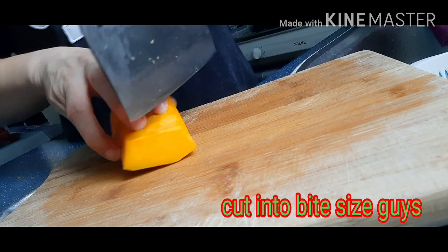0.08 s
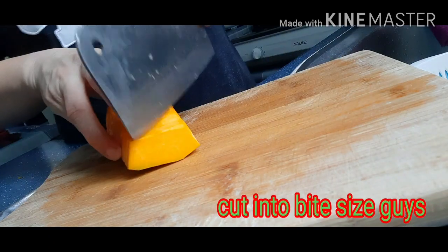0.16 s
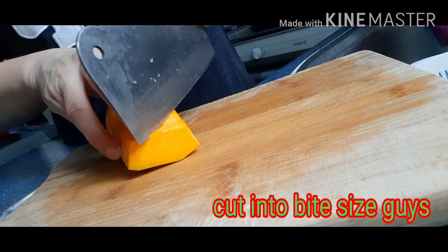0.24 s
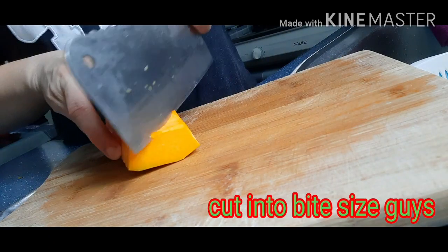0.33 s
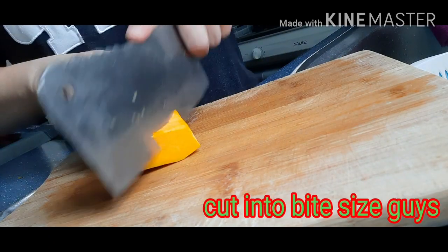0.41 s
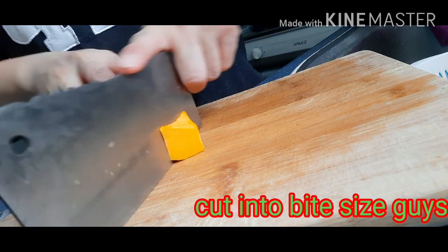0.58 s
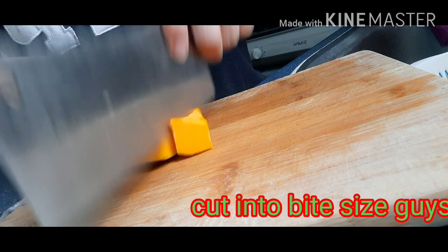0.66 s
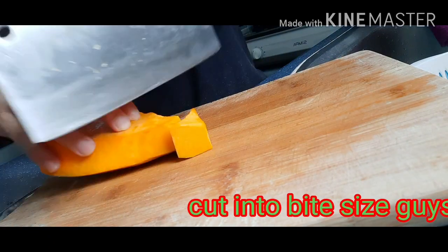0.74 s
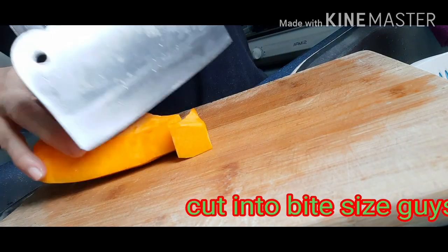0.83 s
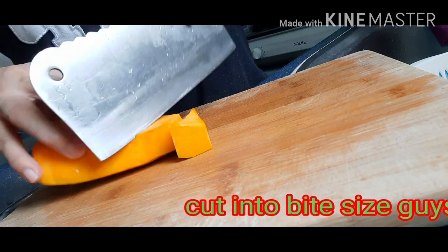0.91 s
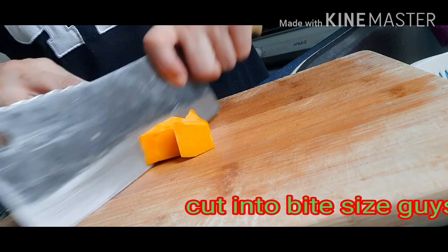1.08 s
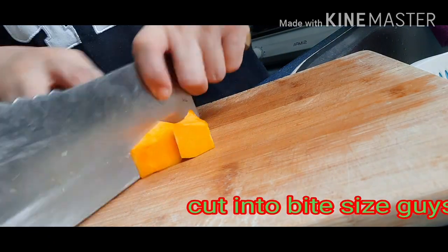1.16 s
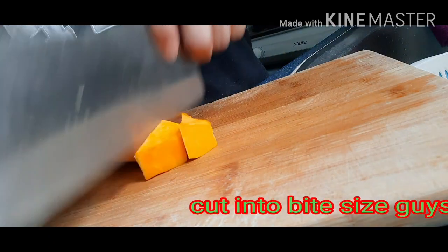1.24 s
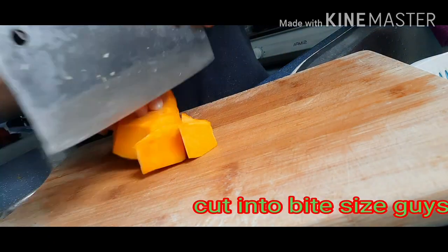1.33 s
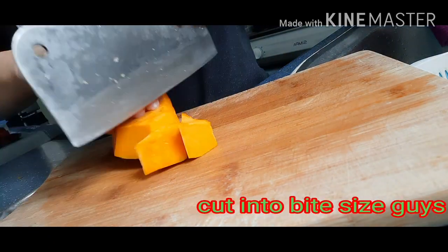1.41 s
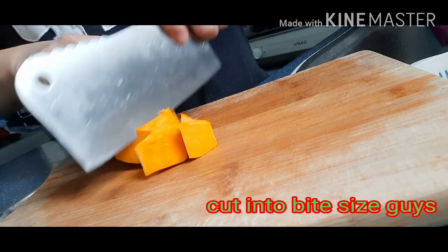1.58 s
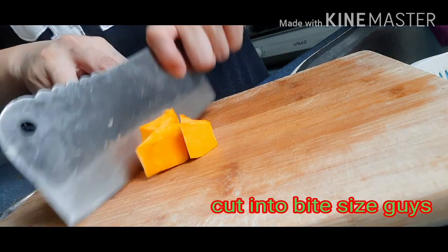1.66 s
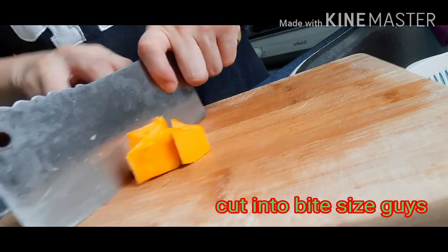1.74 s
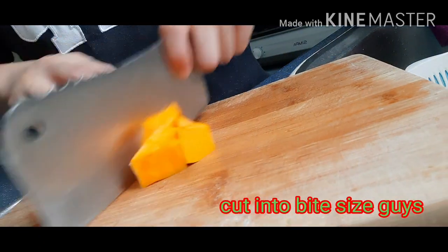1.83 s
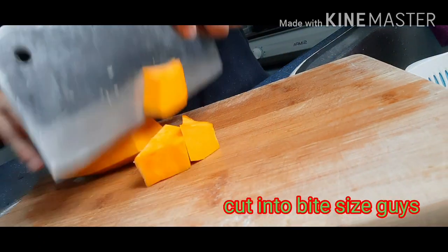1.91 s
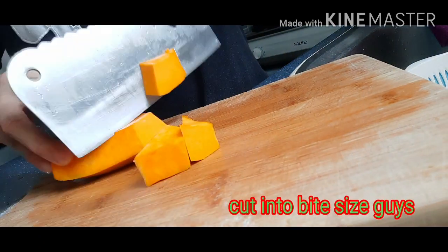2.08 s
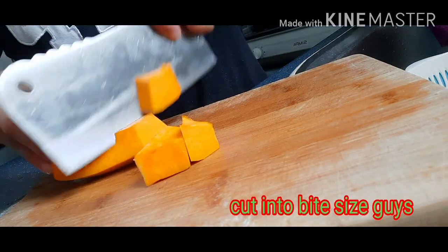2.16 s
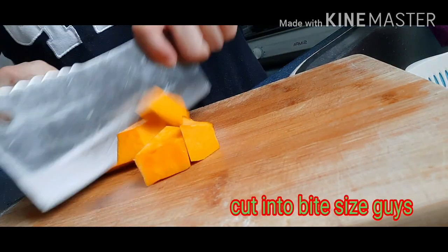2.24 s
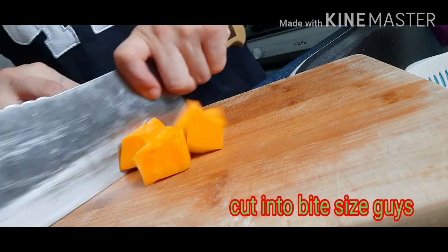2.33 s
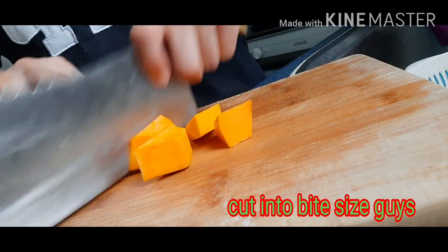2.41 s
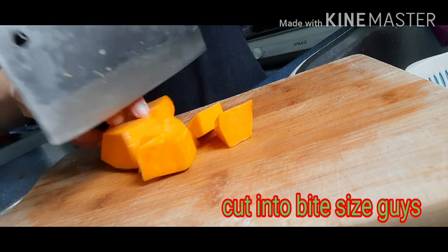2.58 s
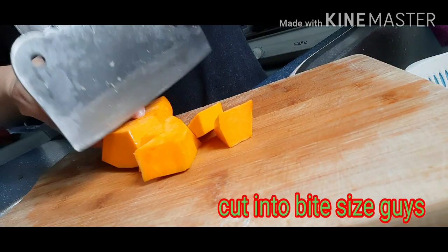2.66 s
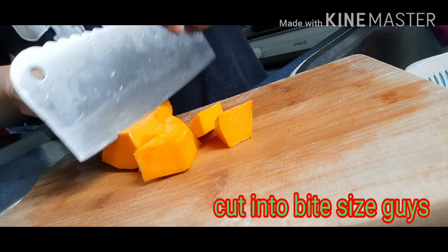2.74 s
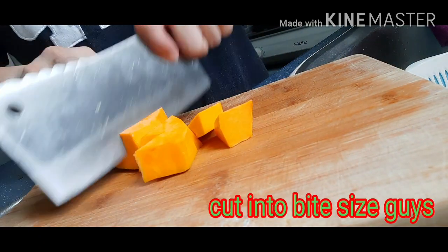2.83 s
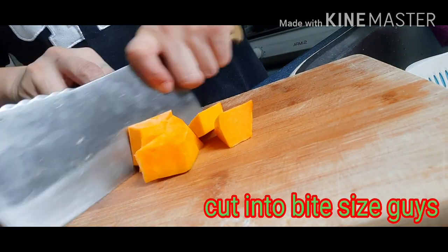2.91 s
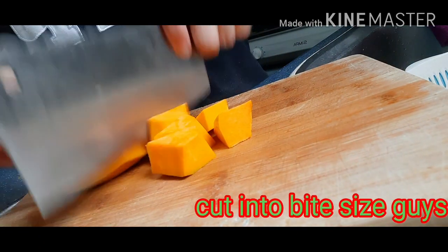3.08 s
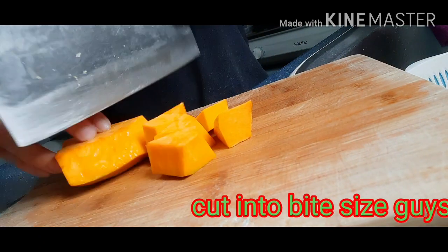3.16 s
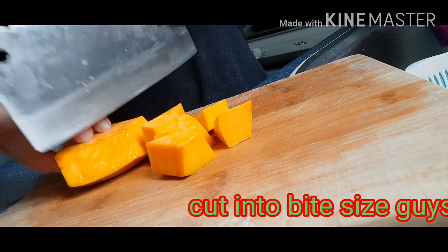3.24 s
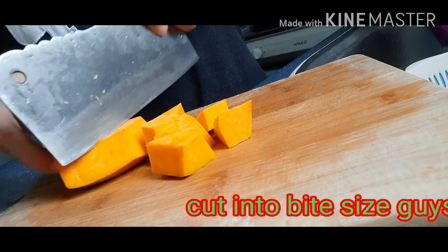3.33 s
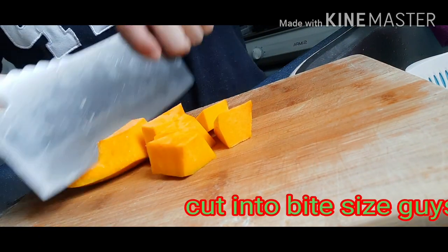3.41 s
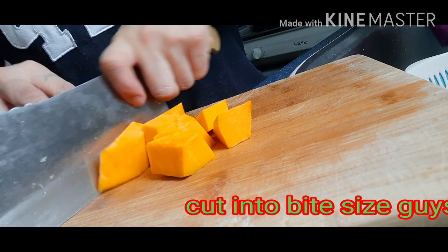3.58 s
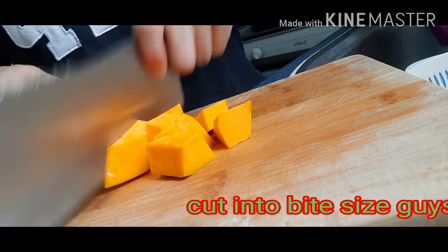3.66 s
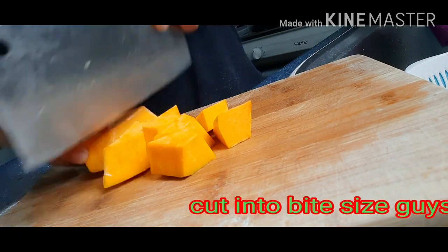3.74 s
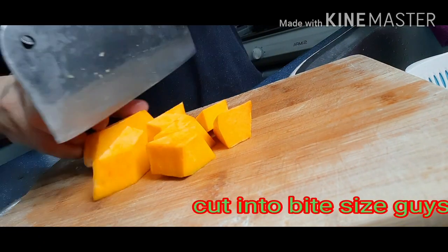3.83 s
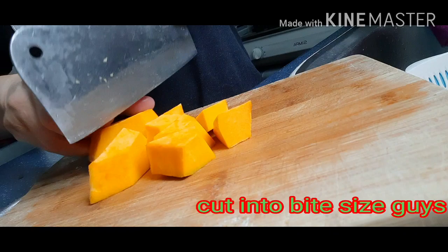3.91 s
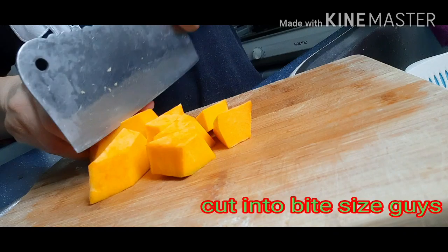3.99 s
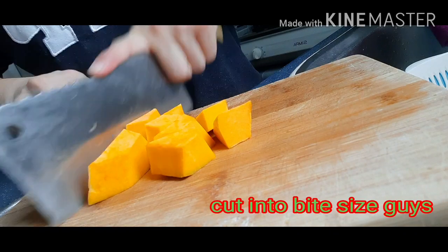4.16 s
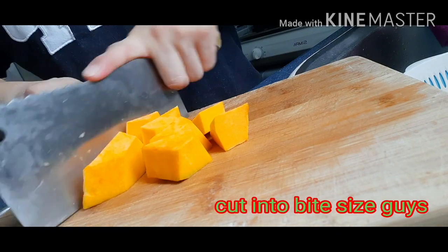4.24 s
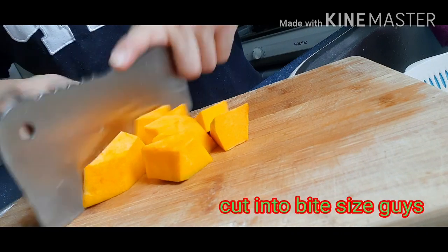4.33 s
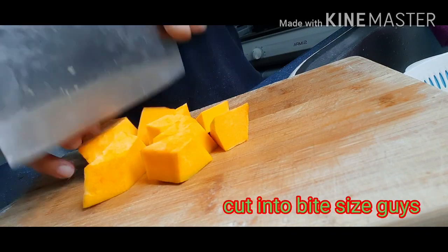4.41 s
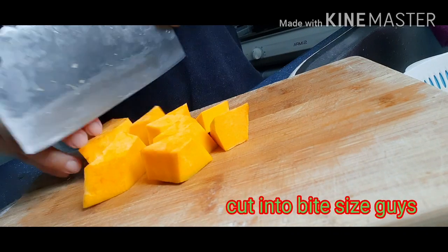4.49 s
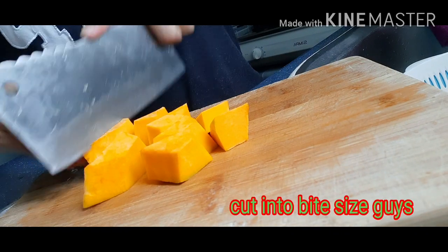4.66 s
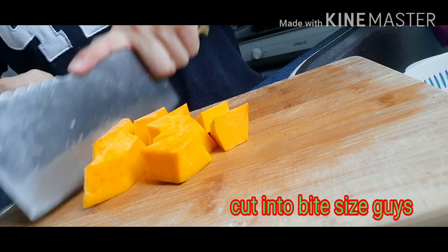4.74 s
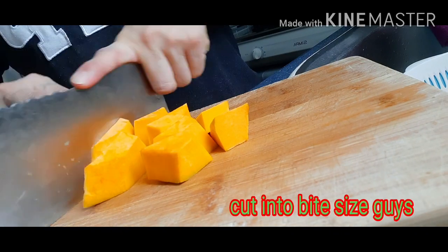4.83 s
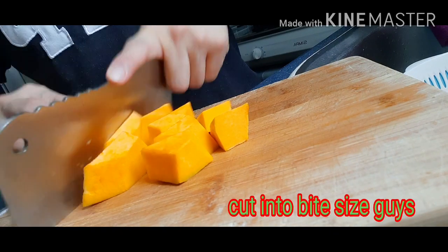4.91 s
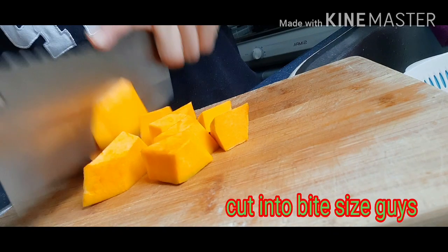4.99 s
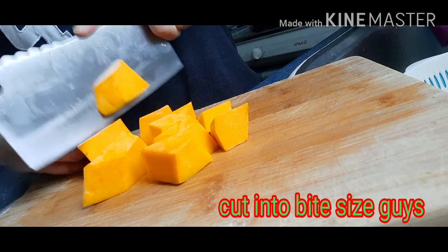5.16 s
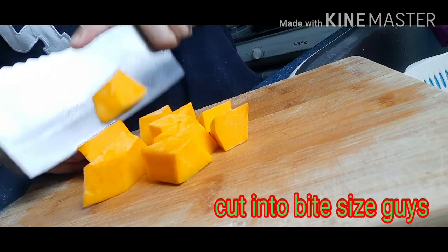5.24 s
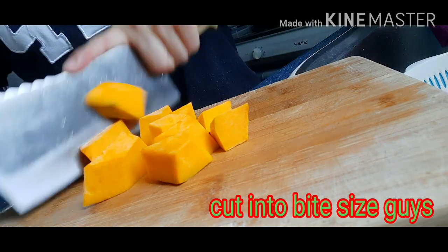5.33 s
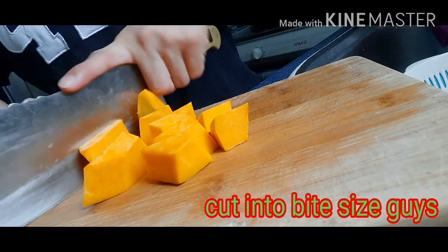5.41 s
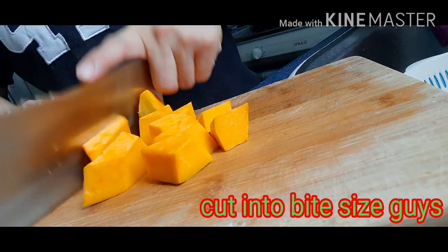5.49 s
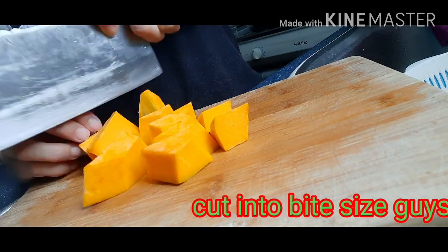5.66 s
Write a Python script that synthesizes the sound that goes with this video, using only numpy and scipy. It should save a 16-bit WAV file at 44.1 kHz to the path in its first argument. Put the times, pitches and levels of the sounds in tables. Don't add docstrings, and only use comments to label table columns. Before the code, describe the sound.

A steel cleaver hisses through raw pumpkin and lands in hard, ringing knocks on a thick wooden board in a small kitchen.

```python
import sys
import numpy as np
from scipy import signal
from scipy.fft import rfft, irfft, next_fast_len
from scipy.io import wavfile

SR = 44100
rng = np.random.default_rng(int(sys.argv[2]) if len(sys.argv) > 2 else 0)


def decibels_to_gain(level_db):
    exponent = np.asarray(level_db, float) / 20
    return 10 ** exponent


def persist_wave(psi):
    counts = np.round(np.clip(psi, -1, 1) * 32767).astype(np.int16)
    wavfile.write(sys.argv[1], SR, np.atleast_2d(counts).T)


N = 250488

# [f/Hz, level/dB, t60/s]
EDGE = [(1610, -11, .06), (1800, -15, .02), (2030, -16.5, 0.029), (2072, -8, .08), (2160, -1.5, 0.053),
        (2140, -10, 0.027), (2375, -13, 0.017), (2720, -11, 0.039), (2930, -8, 0.014), (3070, -10, .02),
        (3656, -14.5, 0.037), (3900, -10, .015), (4250, -11, 0.011), (4960, -14, 0.0042)]
# [t/s, level/dB]
BUSY = [
    (0, -1),
    (.8, -0.5),
    (1.5, -1),
    (2.5, 0),
    (3.25, -5),
    (3.8, -1.5),
    (4.5, -1),
    (5.1, 1),
    (5.68, 0.5),
]


def rms_one(x):
    return x / np.sqrt(np.mean(x ** 2) + 1e-20)


def at_hz(points, hz):
    points = np.array(points)
    return np.interp(np.log(hz), np.log(points[:, 0]), points[:, 1])


def filtered(x, order, hz, kind):
    return signal.sosfilt(signal.butter(order, hz, kind, fs=SR, output="sos"), x)


def busy_db():
    return np.interp(np.arange(N) / SR, *np.transpose(BUSY))


def drift(rate):
    r = np.exp(-80 * np.pi * rate / SR)
    noise = rng.standard_normal(N // 40 + 2002)
    slow = signal.lfilter([1], [1, -2 * r, r * r], noise)[2000:]
    return np.interp(np.arange(N) / 40, np.arange(len(slow)), rms_one(slow))


def clicks(s, db):
    out = np.full(N, 1e-18)
    np.add.at(out, np.round(np.asarray(s) * SR).astype(int), decibels_to_gain(db))
    return out


def soften(x, hz):
    r = np.exp(-2 * np.pi * hz / SR)
    return signal.lfilter([(1 - r) ** 2], [1, -2 * r, r * r], x)


def ring(force, hz, t60):
    r = decibels_to_gain(-60 / (t60 * SR))
    w = 2 * np.pi * hz / SR
    return signal.lfilter([0, np.sin(w)], [1, -2 * r * np.cos(w), r * r], force)


def banded(source, spectrum, patchy_db, patch_rate):
    # [f/Hz, likeness]
    likeness = [(60, 0.9), (300, 0.98), (1000, 0.73), (3000, 0.047), (10000, 0.026)]
    out, together = 0, drift(2.7)
    low, high = spectrum[0][0], spectrum[-1][0]
    edges = np.geomspace(low, high, int(3 * np.log2(high / low)) + 2)
    for k, (lo, hi) in enumerate(zip(edges, edges[1:])):
        mid, side = filtered(source[k % 2], 2, [lo, hi], "band")
        hz = np.sqrt(lo * hi)
        alike = np.clip(at_hz(likeness, hz), 0, 1)
        flicker_db = patchy_db * (0.19 * together + drift(patch_rate))
        gain = decibels_to_gain(at_hz(spectrum, hz) + flicker_db)
        out = out + gain * (np.sqrt(1 + alike) * mid + np.sqrt(1 - alike) * side * [[1], [-1]])
    return rms_one(out)


def room_air():
    # [f/Hz, level/dB]
    air_colour = [(760, -31), (1300, -43), (1600, 14), (1870, -12), (2230, -1), (2740, 22.5), (2980, 1),
                  (3630, 5.5), (5330, -52.5), (5910, -6), (7500, -23), (11200, -11.5), (15500, -58.5)]
    air = banded(rng.standard_normal((2, 2, N)), air_colour, patchy_db=0.8, patch_rate=5.0)
    return decibels_to_gain(-72.5 + 2.5 * busy_db()) * air


def cupboards_and_pans():
    # [f/Hz, width/Hz, level/dB]
    hums = [(439, 45, -67), (764, 89, -69.5), (1052, 88, -73), (1527, 60, -78), (2210, 250, -74),
            (2810, 180, -91.5), (3440, 168, -86.5), (5930, 350, -91.5)]
    mid, side = rng.standard_normal((2, N))
    noise = mid + 0.35 * side * np.array([[1], [-1]])
    return sum(decibels_to_gain(db) * rms_one(ring(noise, hz, 3.4 / width_hz)) for hz, width_hz, db in hums)


def kitchen_echo(x):
    # [f/Hz, t60/s]
    room_fade = [(100, 0.064), (500, 0.13), (2000, 0.27), (8000, 0.26), (16000, 0.12)]
    size = next_fast_len(N + SR)
    hz = np.maximum(np.arange(size // 2 + 1) * SR / size, 1)
    t60 = at_hz(room_fade, hz)
    out = np.zeros((2, size // 2 + 1), complex)
    for k, lag_s in enumerate(rng.uniform(0.006, 0.035, size=16)):
        loop = decibels_to_gain(-60 * lag_s / t60) * np.exp(-2j * np.pi * hz * lag_s)
        out[k % 2] += (-1) ** (k // 2) * loop / (1 - loop)
    out = out + out[::-1] * 0.22 / (1 + (hz / 750) ** 2)
    return irfft(out * rfft(x, size), size)[:, :N]


def hands_rumble():
    # [t/s, level/dB]
    shudders = [
        (.6, -41.5),
        (1.15, -45.5),
        (1.72, -35),
        (2.29, -45),
        (3.07, -40),
        (3.531, -35.5),
        (4.21, -37),
        (4.79, -59),
    ]
    # [f/Hz, level/dB]
    rumble_colour = [(24, -47), (40, -33), (95, -4), (192, 0.5), (284, -11), (303, -13.5), (441, -6.5),
                     (477, -32), (776, -16.5), (839, -23), (966, -14), (1390, -44), (1700, -93),
                     (2210, -56.5), (3740, -120)]
    rise_db_s, fall_db_s = 150, 127.5
    t = np.arange(N) / SR
    peaks = [db - np.maximum(rise_db_s * (s - t), fall_db_s * (t - s)) for s, db in shudders]
    gain = np.hypot(decibels_to_gain(-52 + busy_db()), decibels_to_gain(np.max(peaks, axis=0)))
    return gain * banded(rng.standard_normal((2, 2, N)), rumble_colour, patchy_db=2.0, patch_rate=50.0)


def stroke_levels():
    # [bite t/s, landing t/s, hiss at bite level/dB, hiss near board level/dB, last rush level/dB]
    strokes = [(0.224, 0.485, -91, -55, 10), (0.899, 1.059, -83, -50.5, 5), (1.52, 1.671, -80, -46.5, 1),
               (2.124, 2.272, -71, -54.5, 9.5), (2.696, 2.883, -85, -53, 18),
               (3.348, 3.464, -72, -57, 25.5), (3.977, 4.16, -86.5, -54, 20),
               (4.642, 4.805, -68, -54, 11.5), (5.213, 5.356, -81, -47, 9.5), (1.087, 1.17, -49, -58.5, -6),
               (3.007, 3.017, -59, -51, 3), (5.417, 5.442, -57, -47.5, -0.5)]
    # [t/s, hiss level/dB, rasp level/dB, t60/s]
    rubs = [(.0, -66, -58.5, 0.28), (0.047, -68.5, -64, 0.59), (.198, -70, -62.5, 0.17),
            (0.491, -38.5, -33.5, 0.26), (0.89, -47, -64, 0.03), (1.065, -43, -35, 0.22),
            (1.1, -47, -37.5, 0.21), (1.301, -67.5, -60.5, 0.4), (1.469, -60, -62, 0.083),
            (1.682, -39.5, -38.5, 0.25), (1.698, -40, -50, 0.13), (1.806, -55, -45.5, 0.29),
            (2.085, -67, -32.5, 0.1), (2.276, -35, -28.5, 0.19), (2.376, -55, -49, 0.18),
            (2.481, -65, -61.5, 0.3), (2.885, -36.5, -28, 0.2), (3.023, -58.5, -51.5, 0.41),
            (3.485, -32, -23.5, 0.16), (3.607, -52, -45, 0.16), (3.777, -66, -56, 0.23),
            (4.168, -35, -24, 0.15), (4.302, -49.5, -36.5, 0.19), (4.601, -67, -39, 0.22),
            (4.791, -24.5, -24, 0.065), (4.814, -51, -44, 0.37), (5.182, -53, -27, 0.097),
            (5.358, -46, -39, 0.34), (5.451, -64, -37, 0.046)]
    rush_s = 0.031
    linger_s, fade_db_s = 0.004, 901.5
    swell_bend, fall_bend = 0.44, 0.81
    t = np.arange(N) / SR
    rest_db = np.array([[-82], [-77]])
    power = decibels_to_gain(rest_db + busy_db()) ** 2
    for bite, land, bite_db, deep_db, rush_db in strokes:
        on = (t >= bite) & (t < land + 0.06)
        depth = np.minimum((t[on] - bite) / (land - bite), 1)
        rush = np.clip(1 - (land - t[on]) / rush_s, 0, 1)
        fade_db = fade_db_s * np.maximum(t[on] - land - linger_s, 0)
        hiss_db = bite_db + (deep_db - bite_db) * depth ** swell_bend + rush_db * rush - fade_db
        rasp_db = -50 + 0.64 * (hiss_db + 47)
        power[:, on] += decibels_to_gain(np.array([hiss_db, rasp_db])) ** 2
    for s, hiss_db, rasp_db, t60 in rubs:
        i = round(max(s, 0) * SR)
        since = t[:N - i][:SR // 2]
        rise = np.minimum(since / 0.0015, 1)
        fall = rise * decibels_to_gain(-60 * (since / max(t60, 0.01)) ** fall_bend)
        power[:, i:i + len(since)] += (fall * decibels_to_gain(np.array([[hiss_db], [rasp_db]]))) ** 2
    return np.sqrt(power)


def slicing():
    # [f/Hz, level/dB]
    hiss_colour = [(2350, -82.5), (4000, -4), (4990, -6.5), (6550, -5.5), (11800, -8), (14900, -17),
                   (16000, -16)]
    rasp_colour = [(760, -10.5), (1300, 16), (1400, -8.5), (1550, 1), (1650, -5.5), (2130, 15), (5000, 7),
                   (6500, -86.5), (11000, -120)]
    grind_colour = [(260, -43.5), (450, 8.5), (562, 2.5), (1150, -1.5), (1360, -24), (1500, -6),
                    (1950, -77.5), (3300, -120)]
    hiss_gain, rasp_gain = stroke_levels()
    torn = rng.random(N) < 1200 * decibels_to_gain(3.0 * drift(25.0)) / SR
    grains = torn * decibels_to_gain(2.8 * np.minimum(rng.exponential(1, N), 4))
    sizes = 1 + 0.7 * signal.lfilter([1], [1, -0.95], grains)
    friction = rng.standard_normal((2, 2, N)) * sizes
    hiss = banded(friction, hiss_colour, patchy_db=1.2, patch_rate=30.0)
    rasp = banded(friction, rasp_colour, patchy_db=1.2, patch_rate=30.0)
    grind = banded(friction, grind_colour, patchy_db=1.2, patch_rate=30.0)
    singing = rms_one(sum(decibels_to_gain(db) * ring(friction[0, 0], hz, t60) for hz, db, t60 in EDGE))
    grind_gain = decibels_to_gain(0.5) * np.minimum(rasp_gain, decibels_to_gain(-44.5))
    blade = rasp_gain * (rasp + decibels_to_gain(-24.5) * singing) / 1.37
    return hiss_gain * hiss + blade + grind_gain * grind


def cracks():
    # [t/s, peak level/dB, t60/s, brightness/dB (top up, body down)]
    splits = [(0.1964, -60.5, 0.039, 24), (0.493, -11, 0.013, 8), (0.517, -39, 0.087, -19),
              (0.888, -43, .04, 5), (1.064, -22.5, 0.027, -15), (1.072, -29, .012, 12),
              (1.176, -39, 0.016, 10), (1.53, -47, 0.037, 12.5),  (1.684, -12.5, 0.032, 15.5),
              (1.8078, -51, 0.032, -6), (2.088, -38.5, 0.0084, -25.5), (2.276, -33, 0.017, 1),
              (2.378, -44, .035, 6), (2.5631, -48.5, 0.083, 7), (2.692, -46, 0.044, 9),
              (2.751, -40.5, 0.074, 4), (2.8744, -27, 0.024, 13), (2.8882, -15.5, 0.01, -22),
              (3.0096, -54.5, .02, 7), (3.0235, -33.5, 0.019, -15), (3.0584, -53.5, 0.022, -21),
              (3.306, -49, 0.092, 10), (3.456, -17.5, 0.018, 19), (3.47, -19, 0.093, 4),
              (3.487, -15, 0.035, -13.5), (3.611, -35.5, 0.039, 11), (3.978, -47.5, 0.053, 13),
              (4.13, -34.5, 0.098, 12), (4.146, -33, 0.03, 0), (4.163, -32.5, 0.022, -5),
              (4.166, -13, 0.034, 16.5), (4.301, -34.5, 0.011, -31), (4.6, -36, 0.014, -24.5),
              (4.786, -26, .03, -8), (4.791, -11, 0.021, 14), (5.185, -33.5, 0.03, -13),
              (5.322, -34, 0.098, 15), (5.3357, -27, .04, 11), (5.355, -17.5, 0.037, 16),
              (5.364, -22.5, 0.053, 17.5)]
    shapes = np.zeros((3, N))
    for s, db, t60, bright_db in splits:
        i = round(s * SR)
        t = np.arange(min(N - i, SR // 5)) / SR
        rise = 1 - np.exp(-t / 0.00063)
        fall = rise * decibels_to_gain(db - 20 - 60 * t / max(t60, 0.004))
        shapes[:, i:i + len(fall)] += fall * decibels_to_gain(np.array([[-bright_db], [0], [bright_db - 9]]))
    out = 0
    for shape, band_hz in zip(shapes, [(900, 4500), (4500, 9500), (9500, 14500)]):
        noise = rng.standard_normal(N) + 1.1 * rng.standard_normal((2, N))
        out = out + shape * rms_one(filtered(noise, 2, band_hz, "band"))
    return out


def ticks():
    # [t/s, peak level/dB]
    strikes = [(.519, -27), (1.0628, -30), (1.6665, -30), (2.0872, -20), (2.8868, -13), (3.4882, -14),
               (4.171, -22), (4.3017, -18), (4.601, -22), (4.7935, -20), (5.1829, -11)]
    s, db = np.transpose(strikes)
    pulse = filtered(clicks(s, db + 3), 2, (1500, 8300), "band")
    return filtered(pulse, 4, 9700, "low")


def struck(modes, s, db, scatter_db, turn=-1, tilt_db=0, hollow_db=0):
    out = 0
    chance = np.clip(rng.standard_normal((len(s), len(modes))), -1.5, 1.5)
    for k, (hz, mode_db, t60) in enumerate(modes):
        facing_db = np.array([[-1], [1]]) * 1.2 * np.cos(2.4 * k) * hz / (hz + 300)
        spot_db = tilt_db * np.log2(hz / 650)
        middle_db = hollow_db * np.exp(-(np.log2(hz / 620) / 0.48) ** 2)
        blow_db = db + mode_db + spot_db + middle_db + scatter_db * chance[:, k]
        rung = ring(clicks(s, blow_db), hz, t60)
        lag = round(5 * np.sin(1.9 * k))
        out = out - turn ** k * decibels_to_gain(facing_db) * np.array([np.roll(rung, lag), rung])
    return out


def uneven(hz, shared, own):
    common, left, right = rms_one(soften(rng.standard_normal((3, N)), hz))
    return 1 + shared * common + own * np.array([left, right])


def knocks(blows, bright_modes, scatter_db, hard_hz, thump_delay_s, dent_db):
    # [f/Hz, level/dB, t60/s]
    board_modes = [(325, -8, 0.26), (406, -4.5, 0.087), (457, -2.5, 0.017), (519, -6, 0.071),
                   (652.5, -6, 0.081), (793, -7, 0.1), (720, -30.5, 0.012), (862, -18.5, 0.096),
                   (954.7, -6.5, 0.087), (1091, -8.5, 0.058), (1172, -1.5, 0.056), (1426, -26.5, 0.12),
                   (976.5, -14.5, .1), (1330, -26.5, 0.034)]
    counter_modes = [(98.5, -9, 0.11), (111, -10, 0.14), (161, -1, 0.12), (215, 8, 0.022), (209.6, 2, 0.11),
                     (265, -4, 0.09), (302, -5, .06)]
    dent_modes = [(638, -0.5, 0.013), (1230, -3, 0.0085), (2113, -14.5, 0.031)]
    # [t/s, tilt/dB per octave]
    spot = [(.5, -1.5), (1.07, 1.5), (1.67, 1), (2.09, 3.5), (2.28, 0.5), (2.7, 1.5), (2.89, 2), (3.03, -3),
            (3.49, 1.5), (3.62, 1.5), (4.17, 2), (4.3, 0.5), (4.6, 4), (4.8, 4), (5.18, 1), (5.36, 0.5)]
    # [t/s, level/dB near 600 Hz]
    hollow = [(.5, -2), (1.07, -1), (1.1, 2.5), (1.67, 1.5), (1.7, 0), (2.28, 0.5), (2.89, -2), (3.03, 2.5),
              (3.49, -4.5), (4.17, -3), (4.3, -0.5), (4.8, -2.5), (5.2, -7.5), (5.36, -0.5)]
    s, db, thump_db, edge_db = np.transpose(blows)
    place = dict(tilt_db=np.interp(s, *np.transpose(spot)), hollow_db=np.interp(s, *np.transpose(hollow)))
    board = soften(struck(board_modes, s, db - 6, scatter_db, **place), hard_hz)
    dent = soften(struck(dent_modes, s, db + dent_db, scatter_db / 2, **place), hard_hz)
    counter = struck(counter_modes, s + thump_delay_s, db + thump_db, scatter_db / 2, turn=0.91)
    counter = filtered(soften(counter, 390), 3, 94.4, "high")
    clinging = np.clip(uneven(150, 0.3, 0.4), -1, 2)
    edge = clinging * struck(bright_modes, s, db + edge_db - 4, scatter_db / 2)
    rocking = np.clip(uneven(70, 0.15, 0.12), 0.5, 1.4)
    return dent + rocking * board - counter + edge


def cube_taps():
    # [t/s, knock level/dB, counter thump level/dB relative, cube level/dB relative]
    taps = [(0.004, -52.5, 10.5, -15), (0.197, -58.5, 9, -1), (0.592, -57, 17, -24), (.646, -63, -4, -25),
            (0.68, -38.5, -16, -16), (0.893, -61, 13.5, -9), (1.02, -56, 11, -20), (1.27, -53, 8, -22),
            (1.574, -59, 10, -11), (1.608, -46, 8, -22), (1.791, -46, 6.5, -25), (1.804, -39.5, -11, -1.5),
            (1.81, -38.5, -16, -13), (1.818, -55.5, 0, 13), (1.829, -43, 1, -9), (1.838, -59, -14, -9),
            (1.873, -46.5, 10, -29), (2.087, -35, -1, 7), (2.25, -46.5, 12.5, -26.5), (2.377, -38, 1, -14),
            (2.389, -36, -10, -3.5), (2.458, -49.5, 3, -21), (2.566, -54, 15, -20), (2.693, -43.5, -4, -2),
            (3.0265, -29, -3, -11), (3.0595, -49, 20, -17), (3.316, -59.5, 24.5, -22),
            (3.413, -69, -8.5, -23), (3.454, -49, -7, -15), (3.615, -39, -0.5, -1.5), (3.684, -39, -8, -18),
            (3.834, -49.5, -5, -36), (3.995, -62.5, 14, -13), (4.012, -48.5, 0, -21), (4.093, -56, -4, -20),
            (4.114, -64, 8, -20), (4.135, -57, 8, -25), (4.3, -23.5, -21, -6), (4.319, -44, 8.5, -21),
            (4.6008, -34, -2, 3), (4.915, -49, 8, -30), (5.1828, -29, -3.5, 8), (5.318, -43, -4, -25),
            (5.6, -51, -15, -25)]
    # [f/Hz, level/dB, t60/s]
    cube_modes = [(1340, 0, 0.0074), (1670, -10.5, 0.022), (2040, -14, 0.027), (2420, -10.5, 0.021),
                  (2760, 0, 0.043), (3180, -9.5, 0.019), (3660, -9.5, 0.022), (4120, -4.5, 0.017),
                  (5000, -11, 0.0081), (5450, -10, .02), (6580, -19, 0.017)]
    return knocks(taps, cube_modes, scatter_db=6.5, hard_hz=2480, thump_delay_s=0.0017, dent_db=-1)


def blade_landings():
    # [t/s, knock level/dB, counter thump level/dB relative, edge level/dB relative]
    chops = [(0.484, -11.5, -7, -15), (0.5013, -16.5, 0, -4), (0.5165, -17.5, -5.5, -22),
             (.533, -29, 3.5, -30), (1.062, -14.5, -9, -8.5), (1.079, -32, -33, -27),
             (1.0995, -23, 2.5, -4), (1.117, -34, -17, -30), (1.666, -13.5, -7, -17),
             (1.695, -35, -28, 1.5), (1.6993, -18.5, 0.5, -6.5), (1.714, -27, -2, -17),
             (1.7195, -28, -16, -12.5), (2.277, -8.5, -11, -21), (2.292, -21, 6, 0), (2.309, -28, 1, -17),
             (2.33, -38.5, 2, -18), (2.884, -10.5, -13, -1.5), (2.896, -15.5, 0.5, -25),
             (2.914, -16.5, -12, -11), (2.935, -28, 1, -25), (3.4852, -12, -9, -16), (3.502, -19, -9, -9),
             (3.52, -27, -1, -26), (4.1695, -9.5, -13, -9), (4.187, -18, 0.5, -20),
             (4.203, -25.5, -11, -21), (4.219, -39, 1.5, -27), (4.793, -12, -11.5, -9.5),
             (4.809, -19.5, -3.5, -30), (4.826, -29, 2.5, -20.5), (5.354, -17, -7.5, -20.5),
             (5.382, -20, -5.5, -32), (5.399, -32.5, 3, -27)]
    return knocks(chops, EDGE, scatter_db=5.5, hard_hz=2200, thump_delay_s=0.0026, dent_db=3)


def scene():
    background = room_air() + cupboards_and_pans() + hands_rumble()
    splits = cracks() + ticks()
    wood = cube_taps() + blade_landings()
    wood_mono = wood.mean(axis=0)
    wood_to_room = soften(wood_mono, 1500) - 0.6 * soften(wood_mono, 280)
    echo = kitchen_echo(decibels_to_gain(-14) * wood_to_room + decibels_to_gain(-19) * splits.mean(axis=0))
    return background + slicing() + splits + wood + echo


def roll_off(x):
    return signal.sosfilt(signal.butter(12, 16820, fs=SR, output="sos"), x)


def record(dry):
    # [f/Hz, level/dB]
    left_tilt = [(60, 0), (300, 0), (1000, -.3), (2100, -4.5), (3500, -3), (12000, -4.5)]
    size = next_fast_len(N + 512)
    hz = np.maximum(np.arange(size // 2 + 1) * SR / size, 1)
    tilt = decibels_to_gain(at_hz(left_tilt, hz) / 2)
    lag_s = 7 / SR / (1 + (hz / 2900) ** 6)
    left = irfft(rfft(dry[0], size) * tilt * np.exp(-2j * np.pi * hz * lag_s), size)[:N]
    right = irfft(rfft(dry[1], size) / tilt, size)[:N]
    ports = filtered([left, right], 5, 76, "high")
    ports = signal.sosfilt(signal.cheby1(8, 1, 15400, fs=SR, output="sos"), ports)
    return roll_off(ports)


dry = scene()
out = record(dry)
persist_wave(out)
```